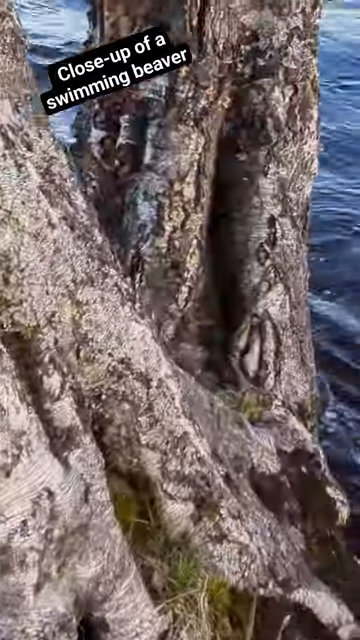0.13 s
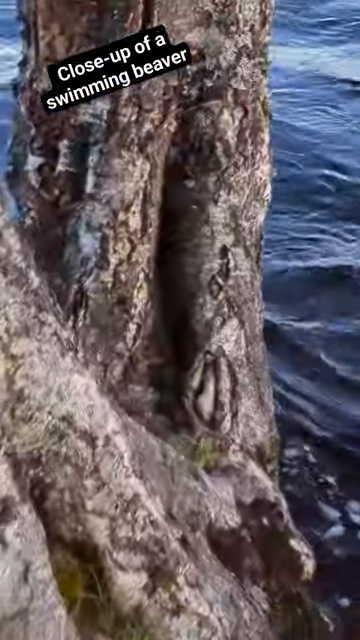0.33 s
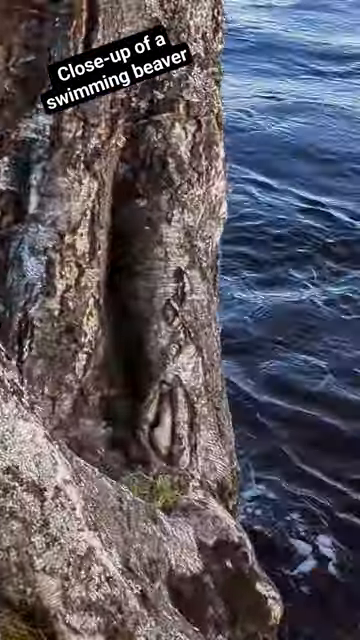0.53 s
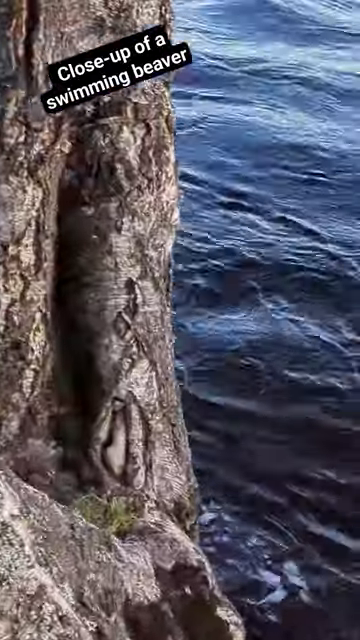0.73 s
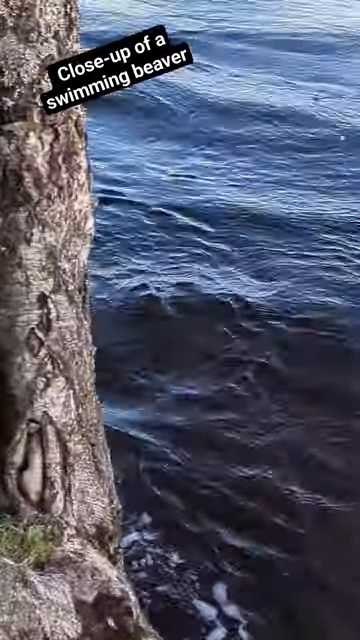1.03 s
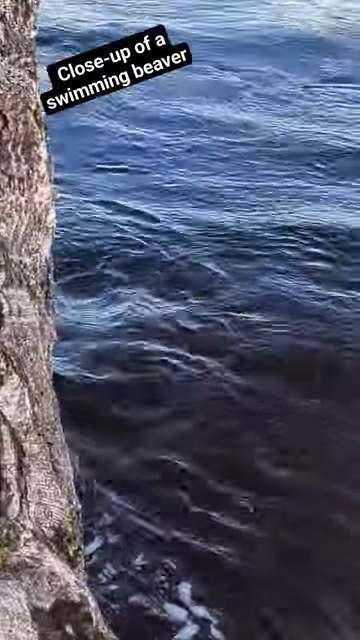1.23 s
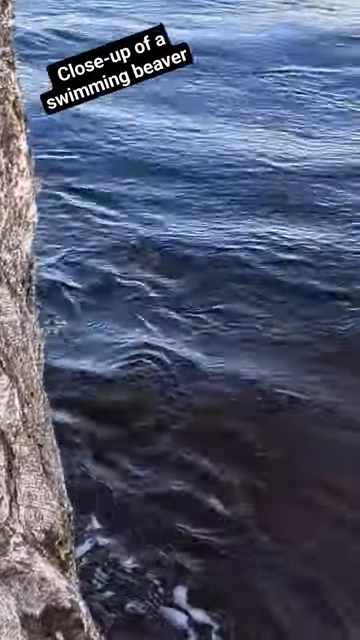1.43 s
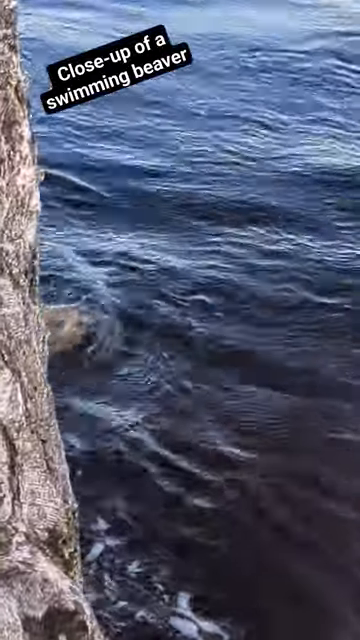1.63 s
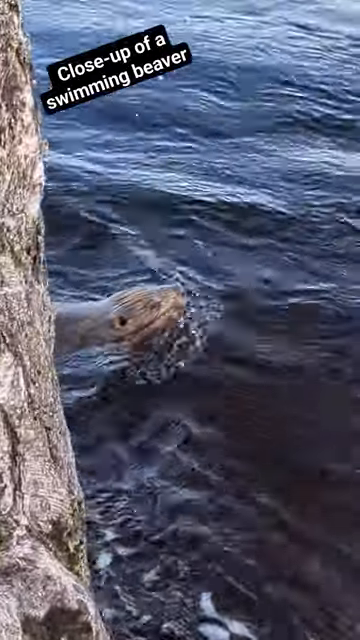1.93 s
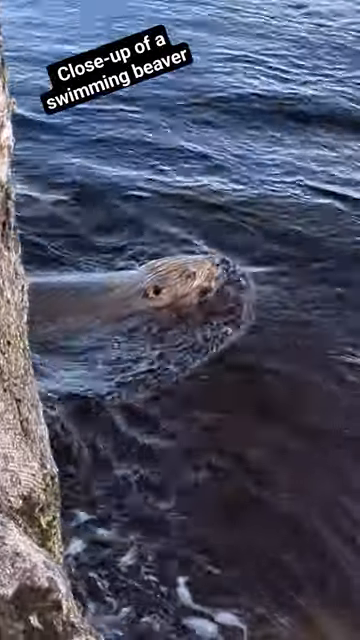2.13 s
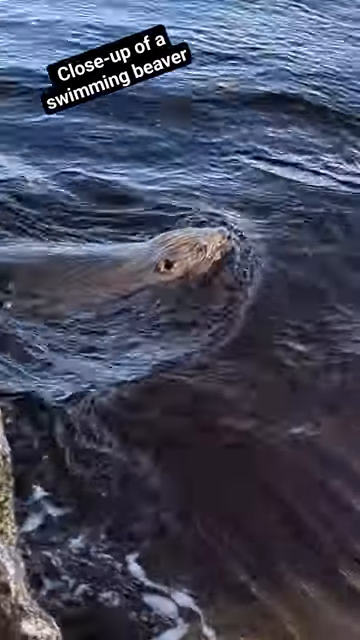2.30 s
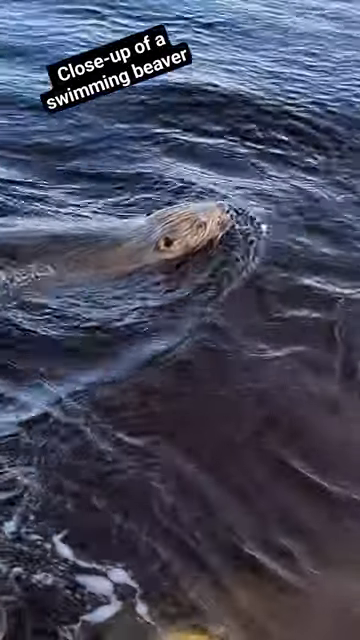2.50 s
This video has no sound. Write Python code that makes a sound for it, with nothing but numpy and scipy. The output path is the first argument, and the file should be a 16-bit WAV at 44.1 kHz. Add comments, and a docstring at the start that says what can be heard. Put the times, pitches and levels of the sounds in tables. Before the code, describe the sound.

Strong wind rumbles and flutters on an unprotected hand-held microphone by open water, quiet at first, then thumping in gusts and tearing raggedly near the end, with faint watery hiss and small close ticks on the right.

```python
"""Gusty wind on a microphone

Wind buffets a hand-held microphone: shaped noise rumbles, flutters, thuds and tears on its two ports,
and short tone bursts make the rounded whumps. Under it lies a faint wash of hiss with tiny clicks and
short soft ticks. Close by, mostly on the right, something like a sleeve swishes (swelling noise) and
ticks (noise that starts suddenly and dies away)."""
import sys
import numpy as np
from scipy import signal
from scipy.fft import rfft, irfft
from scipy.io import wavfile
from scipy.ndimage import uniform_filter1d, minimum_filter1d

SR = 44100
rng = np.random.default_rng(int(sys.argv[2]) if len(sys.argv) > 2 else 0)


def inscribe(sig):
    """Save sig as 16-bit PCM at rate SR to the path in sys.argv[1].

    A 1-D sig is mono; a 2-D sig holds one channel per row.
    Samples are clipped to [-1, 1] before scaling.
    """
    pcm = np.round(np.clip(np.atleast_2d(sig).T, -1, 1) * 32767)
    wavfile.write(sys.argv[1], SR, pcm.astype(np.int16))


N = 117306
T = np.arange(N) / SR  # time of each sample, s
HZ = np.fft.rfftfreq(N, 1 / SR)  # frequency of each spectrum line

# side that the wind strikes harder: (time [s], left minus right [dB])
WIND_LEAN = [(0, -14.5), (.25, 0.5), (.37, 1.5), (.5, -3), (.6, -5.5), (.69, 2), (.87, 1.5), (.95, -5.5),
             (1.28, -3), (1.35, -2), (1.44, -6), (1.62, -2), (1.76, 2), (1.86, -14), (1.94, -5), (2.03, -6),
             (2.14, 2.5), (2.37, -1), (2.5, -4), (2.66, -7)]
# tone balance of ticks and tiny clicks: (frequency [Hz], relative level [dB])
TICK_SPECTRUM = [(800,-16),(2500,-5),(3200,-9),(4100,10),(5600,-7.5),(7000,-0.5),(8100,6),(9600,-4),(12000,-4),(16000,-26.5)]


def amp(db):
    """Decibels to gain."""
    return 10 ** (np.asarray(db) / 20)


def unit(x):
    """Scales each channel to rms 1."""
    return x / np.sqrt(np.mean(x ** 2, -1, keepdims=True) + 1e-20)


def curve(points):
    """Joins the points of a table into a value at every sample."""
    return np.interp(T, *np.transpose(points))


def at_hz(points, hz):
    """Reads a table on a log-frequency axis."""
    f, value = np.transpose(points)
    return np.interp(np.log(hz + 1), np.log(f), value)


def coloured(x, colour):
    """Filters x by a table of levels, then scales it to rms 1."""
    return unit(irfft(rfft(x) * amp(at_hz(colour, HZ)), N))


def noise(colour, shared=0):
    """Stereo noise; 'shared' is the part of its power common to both ports."""
    z = rng.standard_normal((3, N))
    shared = np.clip(shared, 0, 1)
    mixed = np.sqrt(1 - shared) * z[:2] + np.sqrt(shared) * z[2]
    return coloured(mixed, colour)


def steadied(x, span_s):
    """Evens out chance swells slower than about the span."""
    power = irfft(rfft(x ** 2) * np.exp(-(HZ * span_s) ** 2 * 2), N)
    return x / np.sqrt(np.maximum(power, 0) + 0.01)


def wobble(rate_hz):
    """Smooth random ups and downs, separate for each port, at rms 1."""
    return unit(irfft(rfft(rng.standard_normal((2, N))) * np.exp(-(HZ / rate_hz) ** 2), N))


def pan(lean_db):
    """Left and right gains of constant total power; a positive lean favours the left."""
    gains = amp(np.array([[.5], [-.5]]) * lean_db)
    return gains / np.sqrt(np.mean(gains ** 2, 0))


def passing(s, length):
    """Strength of one eddy, 0-1: a peak with soft skirts, falling slower than it rose."""
    width = length * np.where(T < s, .75, 1.15)
    return (1 + 1.62 * ((T - s) / width) ** 2) ** -1.28


def burst(s, length, db, lean):
    """Loudness of one eddy at both ports as it passes."""
    return amp(db) * pan(lean) * passing(s, length)


def snap(s, decay_s):
    """Envelope of a sudden crack, its short ring and a faint tail."""
    crack_s, crack_db = 0.00054, 2
    tail_s, tail_db = 0.0056, -16
    age = np.maximum(T - s, 0)
    crack = amp(crack_db) * np.exp(-age / crack_s)
    ring = .75 * np.exp(-age / decay_s)
    tail = amp(tail_db) * np.exp(-age / tail_s)
    onset = np.minimum(age / 0.00049, 1)  # rises in about half a millisecond
    return onset * (crack + ring + tail)


def rumble():
    """Large slow eddies push on the ports: deep noise, almost separate at each."""
    # the rumble's swells, before the lift below: (time [s], level [dB])
    rumble_swells = [(0,-27.5),(.11,-32),(.21,-26),(.3,-24.5),(.39,-19),(.465,-35),(.5,-19.5),(.54,-31),(.64,-28),(.67,-17.5),(.71,-27.5),(.79,-24),(.91,-28.5),(1.05,-18),(1.18,-22),(1.39,-24.5),(1.47,-17),(1.565,-22),(1.6,-14.5),(1.655,-12),(1.69,-28.5),(1.75,-22),(1.82,-12),(1.91,-27.5),(1.98,-18.5),(2.11,-14.5),(2.2,-20.5),(2.45,-24.5),(2.57,-17.5),(2.66,-14.5)]
    # tone balance: (frequency [Hz], relative level [dB])
    rumble_spectrum = [(20, -47), (32, -56), (48, -7.5), (65, -2.5), (95, -4.5), (135, 3), (190, -5),
                       (260, -11), (400, -46), (800, -72)]
    lift_db = 3 + np.array([[1.6], [2.6]])  # left, right
    deep = steadied(noise(rumble_spectrum, shared=0.044), span_s=0.049)
    return deep * amp(curve(rumble_swells) + lift_db)


def flutter():
    """Turbulence at each port follows the wind's force, some bands of pitch more strongly than others."""
    # force of the wind at the microphone: (time [s], level [dB])
    wind_force = [(0,-45.5),(.12,-47.5),(.205,-35),(.235,-36),(.298,-29),(.325,-20.5),(.39,-24.5),(.42,-30.5),(.46,-29),(.494,-24.5),(.52,-35),(.6,-32.5),(.65,-39),(.675,-21),(.715,-29.5),(.748,-19),(.81,-22),(.835,-26.5),(.865,-12.5),(.905,-33),(.935,-28),(.97,-29),(1.02,-21),(1.11,-22.5),(1.165,-36),(1.215,-30),(1.27,-30.5),(1.35,-20.5),(1.395,-30),(1.44,-23.5),(1.49,-20.5),(1.52,-30.5),(1.57,-25.5),(1.63,-20.5),(1.695,-26),(1.735,-19),(1.8,-19),(1.86,-23.5),(1.91,-28),(1.96,-24),(2.06,-22),(2.16,-16.5),(2.2,-23),(2.27,-27),(2.3,-25),(2.385,-22),(2.43,-34),(2.53,-30),(2.59,-23),(2.66,-20)]
    # how strongly each band follows the force: (frequency [Hz], change per dB of force [dB])
    band_follow = [(150, 2.21), (300, 1), (600, 1.4), (1200, 1), (3000, 1.64)]
    # tone balance at the reference force: (frequency [Hz], relative level [dB])
    flutter_spectrum = [(60, -24), (140, -16.5), (230, 2), (360, -2), (500, -10.5), (700, -22), (1000, -32),
                        (1500, -45), (2500, -52), (5000, -84), (12000, -101)]
    reference_db, flutter_db = -22.5, -17
    eddy_db, eddy_hz, patch_db = 2.5, 97, 2.5  # quick flutter; slower drift of each band
    lean_db = np.array([[.5], [-.5]]) * curve(WIND_LEAN)
    force_db = curve(wind_force) - reference_db + lean_db + eddy_db * wobble(eddy_hz)
    spectrum = rfft(steadied(noise(flutter_spectrum), span_s=0.018))
    out = np.zeros((2, N))
    for k, (_, follow) in enumerate(band_follow):
        # a band is full at its own frequency and fades out towards its neighbours
        band = at_hz([(row[0], j == k) for j, row in enumerate(band_follow)], HZ)
        level_db = force_db * follow + patch_db * wobble(rate_hz=19)
        out += irfft(spectrum * band, N) * amp(level_db)
    return amp(flutter_db) * out


def background():
    """A soft wash of hiss, a random sprinkle of tiny clicks and a few nearer ticks, all bits of noise."""
    # level of the wash: (time [s], level [dB])
    wash_swells = [(0, -38.5), (.2, -41), (.45, -44.5), (.6, -43), (.8, -44), (1.02, -39), (1.25, -47),
                   (1.4, -49.5), (1.6, -44.5), (2.1, -43.5), (2.45, -43.5), (2.66, -44.5)]
    # small soft ticks: (time [s], level [dB])
    soft_ticks = [(2.47, -35), (2.518, -37), (2.533, -39.5), (2.567, -38.5)]
    # tone balance of wash and soft ticks: (frequency [Hz], relative level [dB])
    wash_spectrum = [(100, 18.5), (500, 5), (1000, -5.5), (2000, -5), (3200, -11), (4300, -10), (5600, -16),
                     (6800, -9), (8000, -12), (10000, -17.5), (13000, -20.5), (16000, -35)]
    soft_tick_spectrum = [(600, 3.5), (1700, 5), (3000, -4), (4300, -2), (6000, -12), (8000, -5),
                          (11000, -14), (16000, -25)]
    clicks_per_s, clicks_db, click_decay_s = 110, -61.5, 0.001
    wash = noise(wash_spectrum, shared=0.1) * amp(curve(wash_swells) + 1.5 * wobble(rate_hz=13))
    # each tiny click starts at a random moment with a random strength, then dies away
    starts = rng.random(N) < clicks_per_s / SR
    hits = starts * amp(1.34 * np.minimum(rng.exponential(1, N), 3))
    ringing = signal.lfilter([1], [1, -np.exp(-1 / (click_decay_s * SR))], hits)
    clicks = unit(ringing) * amp(clicks_db) * noise(TICK_SPECTRUM, shared=0.18)
    soft_tick_level = sum(amp(db) * snap(s, decay_s=0.0051) for s, db in soft_ticks)
    nearer = soft_tick_level * noise(soft_tick_spectrum, shared=0.48)
    return wash * pan(lean_db=-1.0) + (clicks + nearer) * pan(lean_db=-7.5)


def whumps():
    """Each eddy is a few rounded pressure swings that sag in pitch as it passes; small ones make blips."""
    # single eddies over the microphone: (time [s], middle pitch [Hz], level [dB], length scale [cycles])
    eddies = [(0.032,95,-18.5,1.35),(.168,140,-17.5,2.7),(0.239,304,-16.5,4.2),(.244,114,-17.5,3.5),(.282,121,-8.5,1.44),(.336,166,-3.5,1.8),(0.373,111,-8.5,1.4),(.391,722,-12.5,5),(.473,324,-11.5,1.9),(.498,194.5,-6,2.4),(.678,560,-13.5,3.2),(.937,124,-2.5,0.97),(1.058,125,-8,2.4),(1.117,152,-4.5,2.55),(1.255,77,-11.5,1.5),(1.378,73,-10.5,1.3),(1.489,172,-3.5,1.7),(1.952,213,-4,1.54),(2.171,256,-13,2.4),(2.239,1380,-30,18),(2.38,350,-6.5,3.9)]
    sag = 0.12  # share of the pitch lost per length scale
    out = np.zeros((2, N))
    phases = rng.random((len(eddies), 2, 1))
    for (s, hz, db, cycles), phase in zip(eddies, phases):
        turns = (T - s) * hz
        near = abs(turns) < 3 * cycles  # beyond this the eddy is inaudible
        u = turns[near] / cycles
        port_phase = phase[0] + np.array([[0], [.3]]) * phase[1]  # the right port differs a little
        swing = np.cos(2 * np.pi * (turns[near] * (1 - .5 * sag * u) + port_phase))
        out[:, near] += amp(db) * np.exp(-2 * u ** 2) * swing
    return out * pan(curve(WIND_LEAN))


def swishes():
    """Finely grained friction: rough noise that swells and breaks off."""
    # fabric swishes: (peak time [s], rise time constant [s], fall time constant [s], level [dB])
    strokes = [(.19,0.027,0.038,-49.5),(.705,0.015,0.014,-47.5),(.77,0.013,0.032,-46),(0.891,0.031,0.014,-36.5),(0.917,0.0094,0.0062,-27.5),(.92,0.057,0.15,-47.5),(.988,0.013,0.0073,-42),(1.493,0.03,0.018,-41)]
    # tone balance: (frequency [Hz], relative level [dB])
    swish_spectrum = [(400, -21), (1500, -8), (3000, -18), (4100, 2.5), (5500, -12.5), (7000, -3.5),
                      (8200, -1), (9800, -4.5), (11500, -7.5), (14000, -12.5), (16000, -17)]
    level = np.zeros(N)
    for s, rise, fall, db in strokes:
        level += amp(db) * np.exp(-np.maximum((s - T) / rise, (T - s) / fall))
    hiss = noise(swish_spectrum, shared=.65) * amp(1.8 * wobble(rate_hz=500)[0])
    return level * pan(lean_db=-6) * unit(hiss)


def ticks():
    """Dry ticks, bursts of noise, some brighter than others, mostly at the right port."""
    # ticks close by: (time [s], level [dB], left minus right [dB], brightness [dB per octave])
    tick_events = [(0.337,-42,-6,-4),(0.396,-43.5,-7,4),(.565,-44.5,-12,1),(1.038,-30,-19,-7),(1.08,-38,-6,2),(1.114,-39.5,-7,7),(1.5028,-25,-5.5,2.5),(1.6,-34,6,-4.5),(1.617,-38.5,-10,13),(1.991,-20.5,-7.5,-2),(2.0864,-25.5,-6,1.5),(2.354,-40,-6,1.5)]
    spectrum = rfft(noise(TICK_SPECTRUM, shared=.65))
    out = np.zeros((2, N))
    octaves = np.log2(np.maximum(HZ, 1000) / 1000)  # above 1 kHz
    for s, db, lean, tilt_db in tick_events:
        grit = unit(irfft(spectrum * amp(tilt_db * octaves), N))
        out += grit * amp(db) * pan(lean) * snap(s, decay_s=0.0036)
    return out


def from_right(x):
    """A sound on the right reaches the left port a little later."""
    delay_s = 0.00036
    left = irfft(rfft(x[0]) * np.exp(-2j * np.pi * HZ * delay_s), N)
    return np.array([left, x[1]])


def buffets():
    """Sharp eddies hit a port: short thuds of noise, each reaching up to its own highest pitch."""
    # thuds: (time [s], length scale [s], level [dB], left minus right [dB], upper edge [Hz])
    thuds = [(0.348,0.0065,-19.5,11,925),(0.39,0.011,-18,3.5,900),(0.496,0.0062,-24.5,14,725),(0.689,0.02,-25.5,-1,540),(0.743,0.0084,-16.5,7,587),(0.776,0.0078,-15,2,605),(0.802,0.0083,-17.5,3,660),(0.862,0.0049,-13.5,13,900),(1.355,0.017,-18,1,885),(1.432,0.013,-33,-10.5,1510),(1.642,0.015,-23.5,7,1050),(1.744,0.0029,-20.5,23,960),(1.773,0.024,-26,-1.5,850)]
    low_hz, edge_steepness, ragged_db = 204, 5.9, 1.5
    spectrum = rfft(rng.standard_normal((2, N)))
    out = np.zeros((2, N))
    for s, length, db, lean, edge_hz in thuds:
        low_cut = HZ / np.hypot(HZ, low_hz)
        shape = low_cut / np.hypot(1, (HZ / edge_hz) ** edge_steepness)
        turbulence = steadied(unit(irfft(spectrum * shape, N)), span_s=0.017)
        out += turbulence * burst(s, length, db, lean)
    return out * unit(amp(ragged_db * wobble(rate_hz=190)))


def tears():
    """Ragged chirps: noise played faster, then slower, so its pitch sweeps up and down with each eddy."""
    # the fastest eddies, which tear and crackle:
    # (time [s], length scale [s], level [dB], left minus right [dB])
    fast_eddies = [(.368,0.0042,-20,9),(1.348,0.0064,-16.5,8),(1.831,0.0058,-11.5,2.5),(1.847,0.0099,-9,17),(1.871,0.019,-26.5,-10),(2.08,0.0018,-11,18),(2.11,.02,-25.5,4),(2.143,0.0076,-12,4),(2.16,0.0081,-13.5,5.5),(2.212,0.0036,-17,11),(2.242,0.0095,-15,8),(2.285,0.015,-16.5,6),(2.305,0.0069,-17,11),(2.324,0.01,-18.5,8),(2.345,0.0097,-18.5,12),(2.375,.012,-19.5,2.5)]
    # tone balance at full speed, before it is roughened: (frequency [Hz], relative level [dB])
    tear_spectrum = [(100, -10.5), (400, 14.5), (1000, 5), (1600, -6.5), (2300, -22), (3600, -30),
                     (6000, -51), (12000, -54.5)]
    slowest, ragged_db = .45, 6  # slowest speed as a share of full speed; roughness
    rough = noise(tear_spectrum) * amp(ragged_db * wobble(rate_hz=500))
    ragged = steadied(rough, span_s=.004)
    out, samples = np.zeros((2, N)), np.arange(N)
    for s, length, db, lean in fast_eddies:
        speed = slowest + (1 - slowest) * np.sqrt(passing(s, length))
        place = np.cumsum(speed)  # where in the noise we read
        place += s * SR - np.interp(s, T, place)  # line up the peak with its time
        chirp = np.array([np.interp(place, samples, port, 0, 0) for port in ragged])
        out += chirp * burst(s, length, db, lean)
    return out


def scene():
    """Wind over the soft background and the close rustles."""
    wind = rumble() + flutter() + whumps() + buffets() + tears()
    return wind + background() + from_right(swishes() + ticks())


def record(dry):
    """A quick limiter holds the peaks, the ends are faded, then the highest treble is cut."""
    edge_hz, ceiling, fade_s = 15900, .97, .003
    gain = minimum_filter1d(np.minimum(1, ceiling / (abs(dry).max(0) + 1e-9)), size=160)
    smooth_gain = uniform_filter1d(uniform_filter1d(gain, size=80), size=80)
    ends = np.minimum(1, np.minimum(T, T[::-1]) / fade_s)
    held = dry * smooth_gain * ends
    low_pass = signal.firwin(511, edge_hz, window=("kaiser", 9), fs=SR)
    return signal.oaconvolve(held, low_pass[None], "same")


dry = scene()
out = record(dry)
inscribe(out)
```